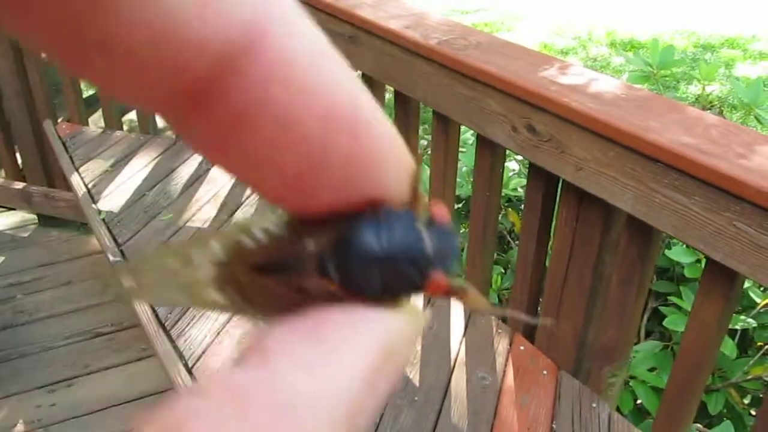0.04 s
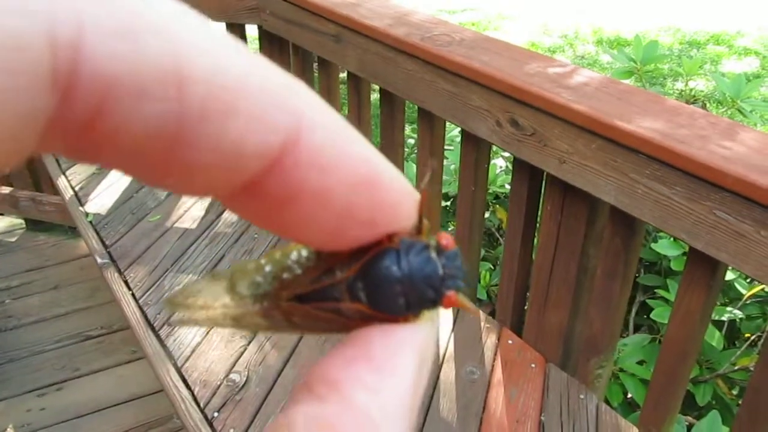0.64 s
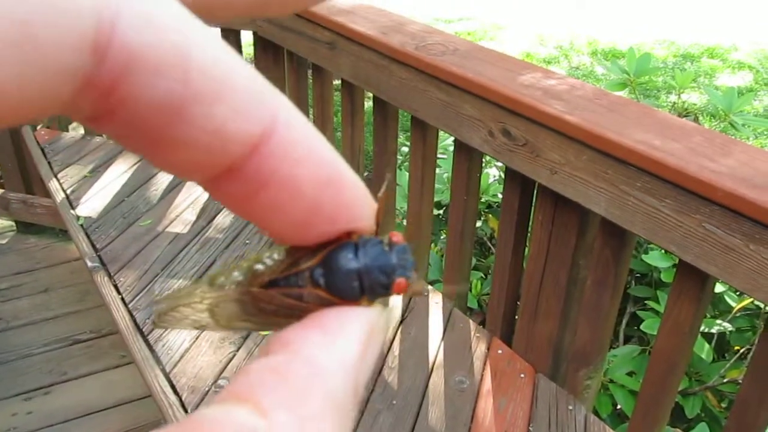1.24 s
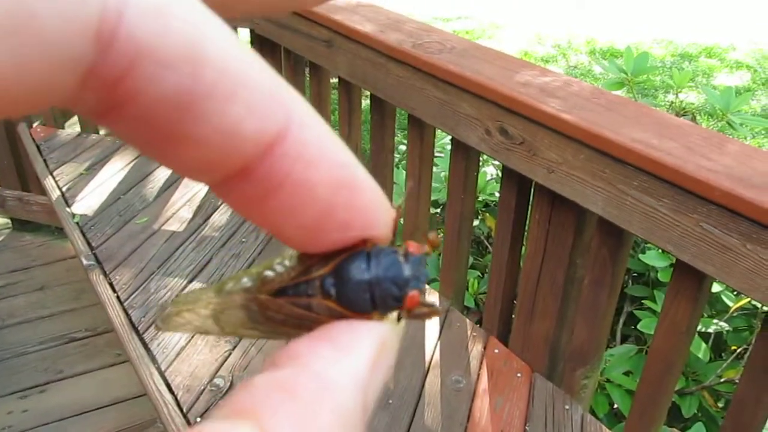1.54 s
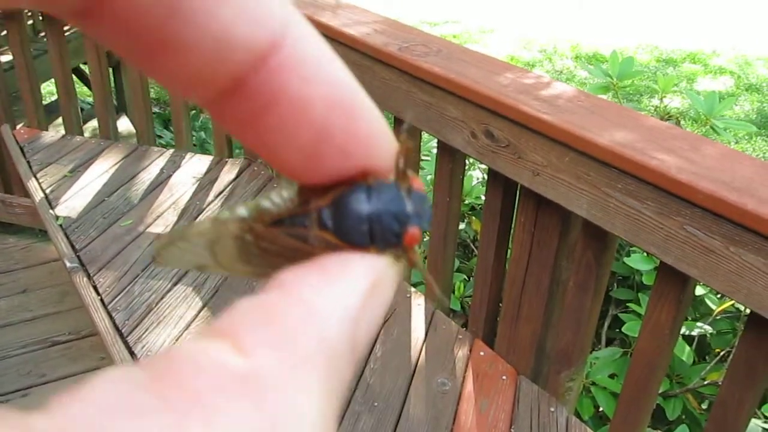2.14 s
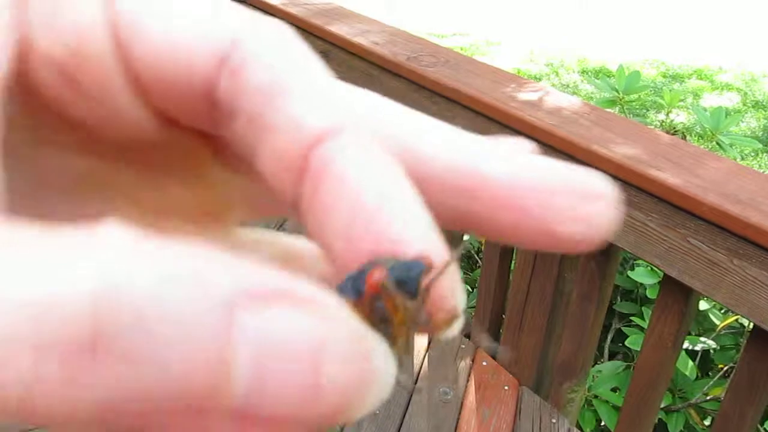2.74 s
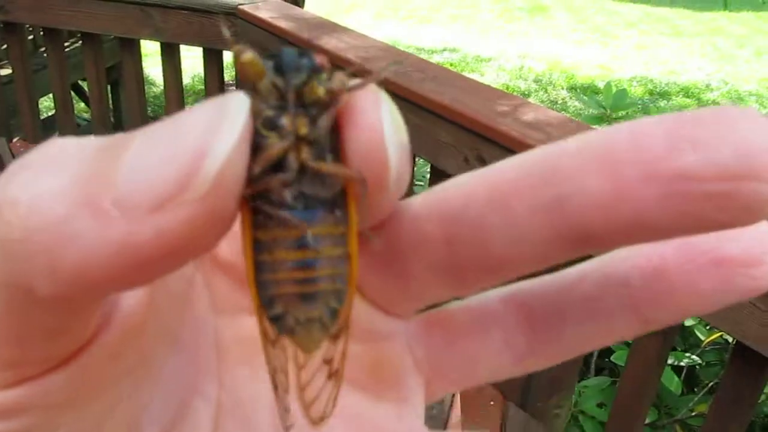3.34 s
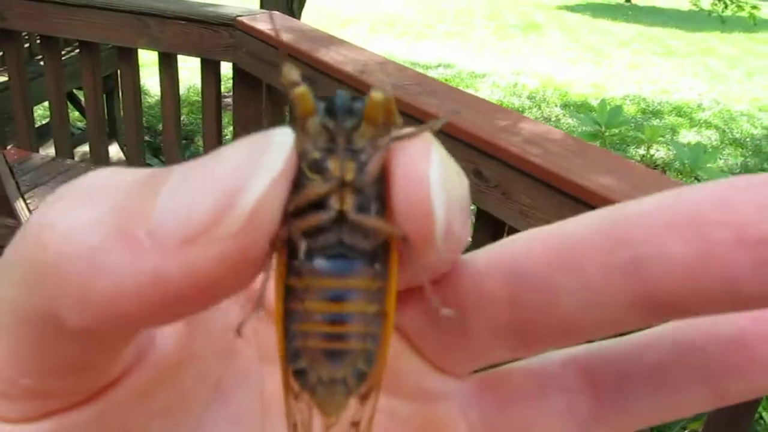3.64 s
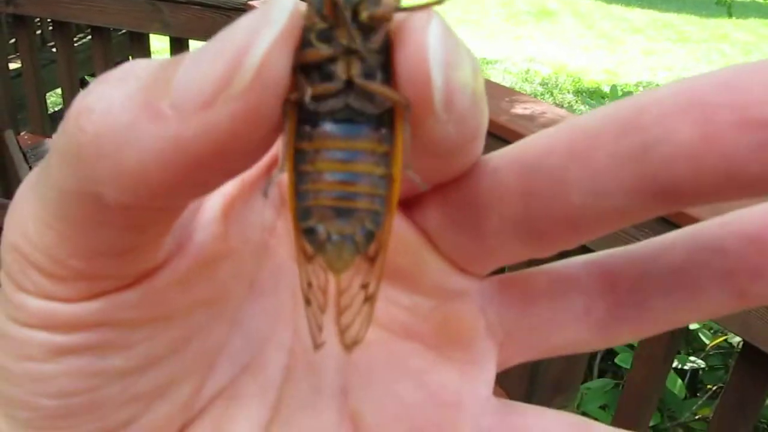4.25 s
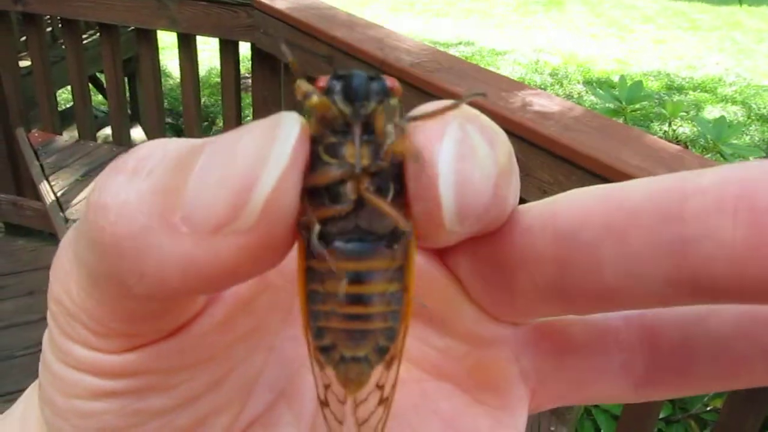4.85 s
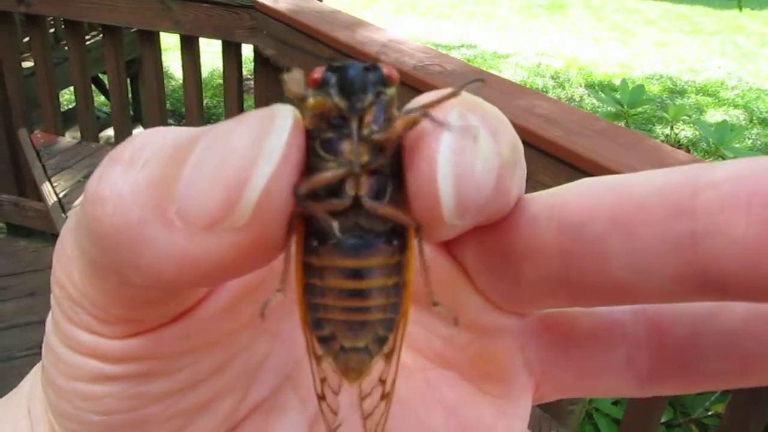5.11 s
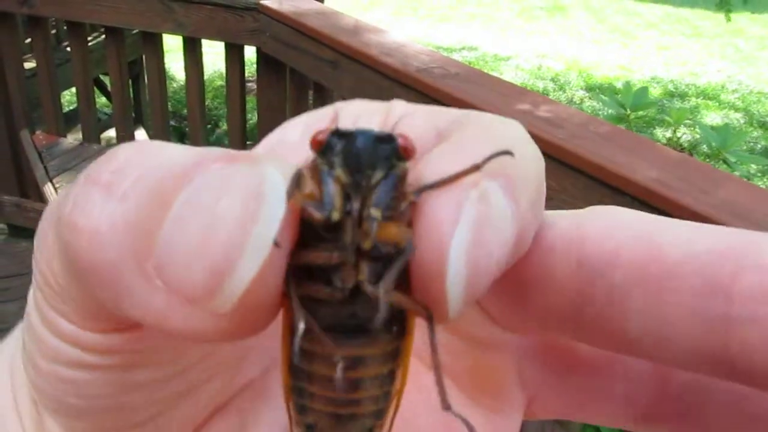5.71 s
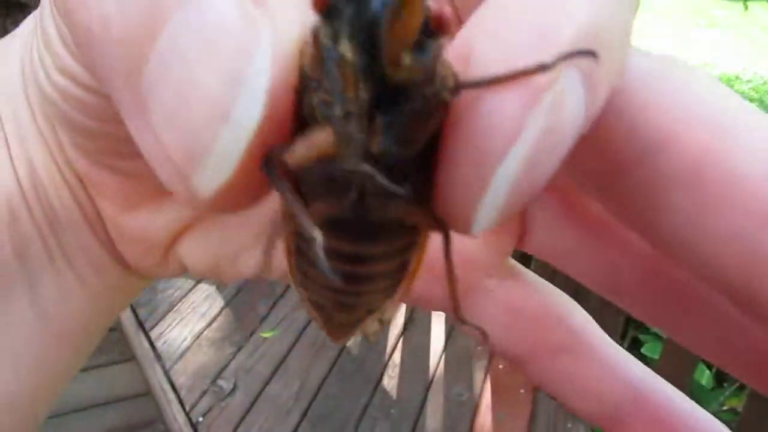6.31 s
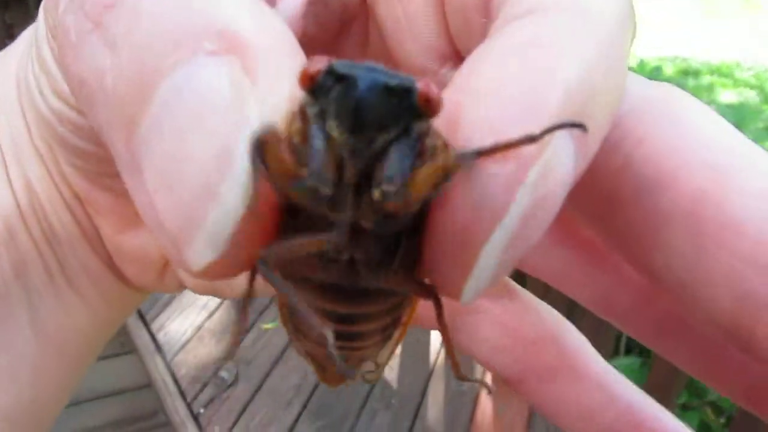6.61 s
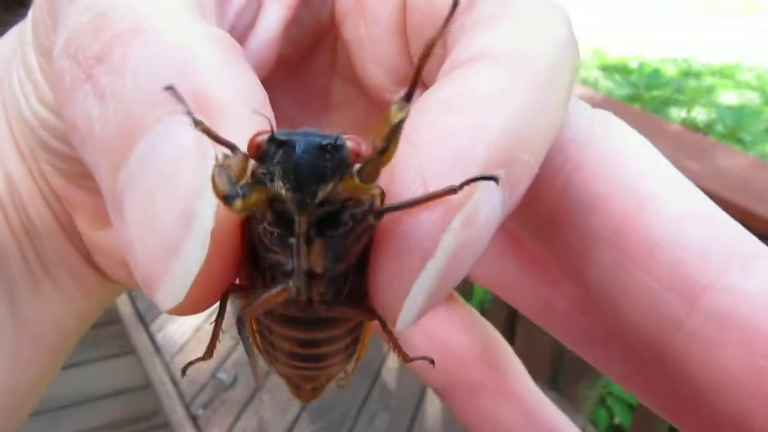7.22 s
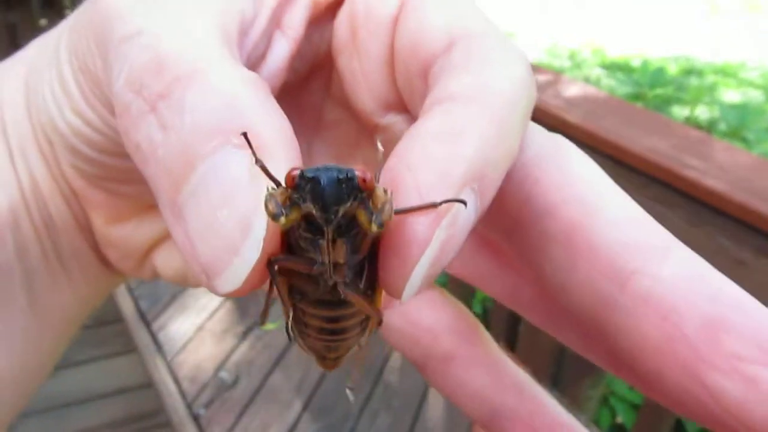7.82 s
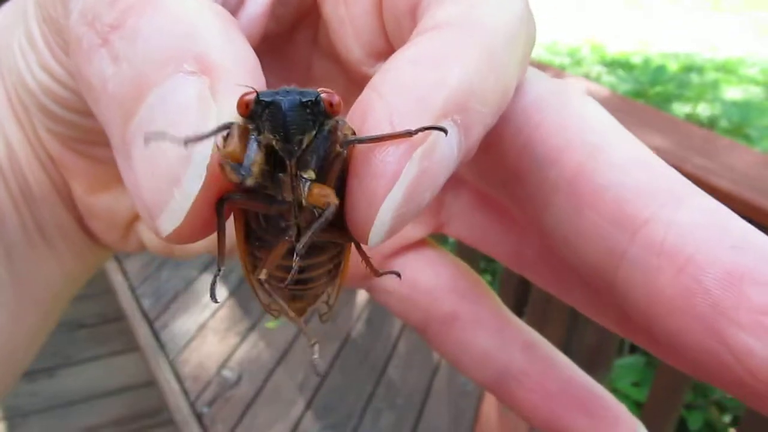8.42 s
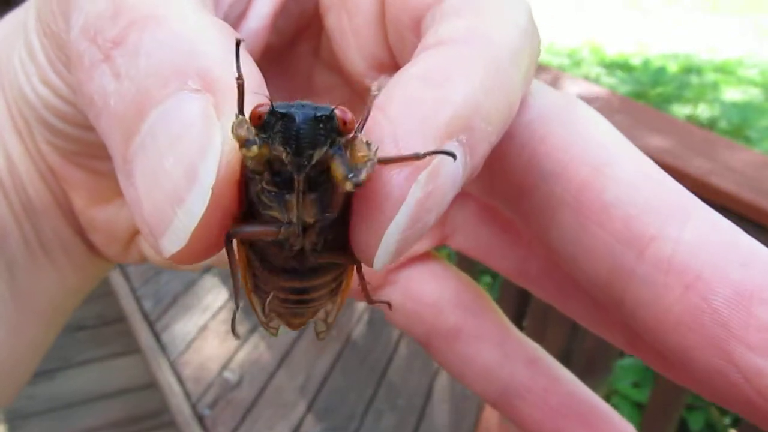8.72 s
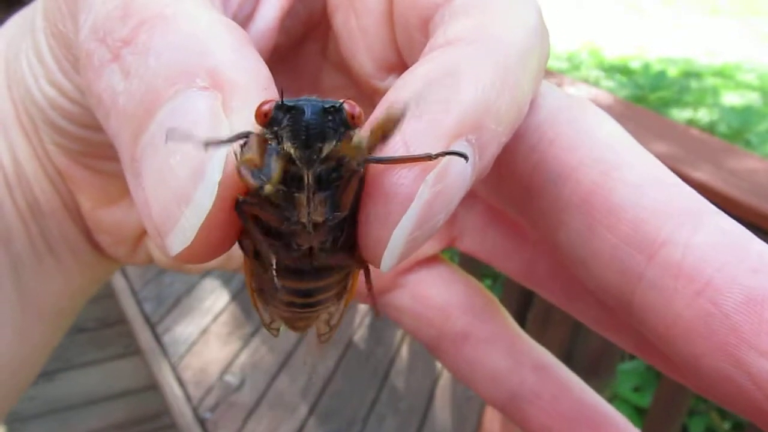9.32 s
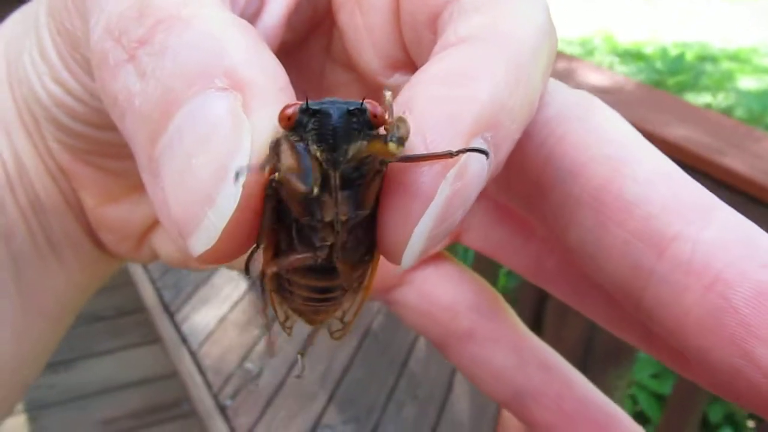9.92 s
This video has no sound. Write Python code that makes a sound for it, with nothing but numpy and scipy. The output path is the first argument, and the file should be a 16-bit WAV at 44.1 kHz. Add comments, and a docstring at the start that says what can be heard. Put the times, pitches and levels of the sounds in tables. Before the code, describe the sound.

A cicada held right at the microphone squawks for the whole ten seconds in very short, rasping, pulsed buzzes, roughly ten a second, uneven in spacing and loudness. They thin out a little around 4 seconds and between 6 and 7, then crowd together from about 8, with one longer buzz just after 9. Behind it, a distant chorus of cicadas in the trees holds a steady high hiss over a hollow, wavering drone. A far bird gives a faint rising whistle at 0.5 seconds, then a rising, a held and another rising whistle from 4.4 to 5.6. A small insect adds one faint, very high sizzle around 1 second. Wind gusts rumble on the microphone, mostly on the right, with low thumps near 1.3, 2.5, 4.3 and 5.2 seconds and the strongest buffeting between 7.7 and 8.8.

```python
"""Short rasping squawks, right at the microphone: a periodical cicada held between finger and thumb.
Each buzz is a run of tymbal pulses: the ribs buckle one after another, click, and pump the hollow abdomen.
Farther off, its brood hisses and drones in the trees around the deck, a distant bird whistles and a small
insect sizzles once on the lawn. Gusts buffet the microphone, mostly at its right port."""
import sys
import numpy as np
from scipy import signal
from scipy.fft import rfft, irfft
from scipy.io import wavfile

SR = 44100
rng = np.random.default_rng(int(sys.argv[2]) if len(sys.argv) > 2 else 0)


def int16_out(signal):
    """Quantize to a 16-bit WAV file."""
    q = np.round(np.clip(np.atleast_2d(signal).T, -1, 1) * 32767)
    wavfile.write(sys.argv[1], SR, q.astype(np.int16))


N = 439236
TIME = np.arange(N) / SR

# Squawks of the held cicada. Each row: start in seconds, length in seconds.
BUZZES = [(0.0, 0.013), (0.038, 0.048), (0.1, 0.036), (0.164, 0.034), (0.245, 0.039), (0.327, 0.035),
          (0.4, 0.033), (0.48, 0.036), (0.569, 0.029), (0.641, 0.036), (0.74, 0.032), (0.872, 0.0085),
          (0.897, 0.048), (0.968, 0.063), (1.141, 0.032), (1.226, 0.039), (1.325, 0.033), (1.431, 0.039),
          (1.515, 0.028), (1.576, 0.057), (1.647, 0.046), (1.73, 0.009), (1.764, 0.035), (1.855, 0.018),
          (2.04, 0.045), (2.124, 0.03), (2.198, 0.036), (2.286, 0.02), (2.352, 0.043), (2.447, 0.085),
          (2.559, 0.027), (2.604, 0.033), (2.709, 0.015), (2.763, 0.026), (2.815, 0.032), (2.872, 0.048),
          (2.998, 0.026), (3.085, 0.028), (3.145, 0.032), (3.296, 0.038), (3.357, 0.043), (3.432, 0.044),
          (3.521, 0.026), (3.585, 0.045), (3.684, 0.02), (3.748, 0.022), (3.947, 0.016), (4.034, 0.017),
          (4.089, 0.036), (4.206, 0.0063), (4.345, 0.025), (4.396, 0.007), (4.456, 0.031), (4.548, 0.03),
          (4.612, 0.036), (4.691, 0.028), (4.754, 0.049), (4.816, 0.044), (4.879, 0.052), (4.956, 0.048),
          (5.022, 0.11), (5.156, 0.04), (5.242, 0.042), (5.403, 0.03), (5.593, 0.078), (5.736, 0.025),
          (5.795, 0.038), (5.847, 0.043), (5.906, 0.053), (5.988, 0.025), (6.075, 0.042), (6.189, 0.017),
          (6.26, 0.032), (6.363, 0.025), (6.533, 0.025), (6.657, 0.02), (6.812, 0.032), (7.013, 0.04),
          (7.184, 0.026), (7.262, 0.027), (7.344, 0.032), (7.443, 0.022), (7.539, 0.042), (7.662, 0.029),
          (7.748, 0.027), (7.809, 0.033), (7.902, 0.032), (7.962, 0.048), (8.034, 0.035), (8.088, 0.058),
          (8.166, 0.068), (8.258, 0.045), (8.323, 0.054), (8.433, 0.034), (8.483, 0.043), (8.542, 0.056),
          (8.616, 0.038), (8.69, 0.045), (8.775, 0.048), (8.854, 0.057), (8.941, 0.046), (9.006, 0.043),
          (9.057, 0.33), (9.41, 0.045), (9.471, 0.047), (9.532, 0.056), (9.616, 0.045), (9.685, 0.057),
          (9.751, 0.048), (9.808, 0.052), (9.887, 0.058)]
# Loudness of the squawks as heard, rising and falling, and ducking under the strongest gust.
# Each row: time in seconds, relative level in dB.
SQUAWK_LEVEL = [(0.0, -19.5), (0.88, -22.0), (1.0, -31), (1.34, -27), (1.6, -19.5), (1.86, -25.0),
                (2.62, -16.5), (3.1, -20.5), (3.31, -18.0), (4.36, -21), (5.04, -16), (5.26, -21),
                (5.81, -17.0), (7.2, -17.5), (8.21, -23.0), (8.45, -29.5), (8.63, -16.5), (8.8, -24.5),
                (9.2, -16.5), (9.43, -18.0), (9.56, -26.5), (9.96, -21.0)]
# How it sits in the grip. Each row: time in seconds, rib rate in Hz at usual loudness, sizzle gain in dB.
POSTURE = [(0, 1124, -2.5), (2.3, 1112, 2), (2.7, 1186, -3), (3.05, 1102, 2), (5.751, 1096, -0.5),
           (5.95, 1149, -2), (6.299, 1094, 2.5), (7.4, 1097, -1.5), (8.3, 1141, 1.5), (9.25, 1150, 0),
           (9.7, 1103, 4.5)]
# The colour its shell gives the clicks. Each row: frequency in Hz, gain in dB.
SHELL = [(1200, -12), (1550, 10), (1850, 3), (2200, 3.5), (2750, -7.5), (3150, 1.5), (4300, 0), (5800, -10),
         (7600, -13), (8900, -9.5), (10000, -13), (12000, -16.5), (13200, -16), (15500, -27.5)]
# Level of the distant hiss as heard; it ducks briefly under the strongest gust.
# Each row: time in seconds, relative level in dB.
HISS_LEVEL = [(0.0, -29.5), (1.27, -28), (1.5, -30.5), (4.02, -26.5), (5.27, -29.5), (8.63, -29.5),
              (8.76, -31.5), (9.96, -27.5)]
# Spectra of the hissing and the droning species. Each row: frequency in Hz, relative density in dB.
HISS = [(1800, -32), (2700, -20), (3200, -15.5), (3900, -7), (4500, -6), (5300, 1), (5800, 2), (6500, -5.5),
        (7200, -15.5), (8700, -21.5), (9800, -32.5), (11800, -33), (15000, -61)]
DRONE = [(200, -17.5), (750, -26), (1100, -11.5), (1270, -1), (1400, 4), (1550, -17), (1750, -18),
         (2600, -38.5)]
# Breeze on the microphone, at first in the open, then in the lee.
# Each row: time in seconds, left and right relative levels in dB.
BREEZE = [(3.5, -42, -39.5), (3.8, -49.5, -44.5)]
# Gusts. Each row: crest in seconds, rise (and fall) time in seconds, left and right relative levels in dB.
GUSTS = [(.17, 0.17, -36, -48), (0.862, 0.71, -50, -38), (1.29, 0.31, -37, -28), (2.52, 0.31, -52, -29.5),
         (3.097, 0.37, -46, -30), (4.293, 0.17, -60, -26.5), (4.698, 0.24, -60, -36),
         (5.237, 0.39, -60, -27.5), (5.861, .25, -36, -29), (6.25, 0.61, -60, -33.5),
         (6.862, 0.23, -60, -30), (7.378, 0.51, -60, -25.5), (7.92, 0.58, -42, -23), (8.52, .2, -27.5, -19),
         (8.769, 0.31, -32, -14.5), (9.302, 0.51, -60, -29), (9.68, 0.11, -39, -28)]
# Sudden shoves of air on the right port. Each row: time in seconds, relative peak in dB.
BUFFETS = [(1.229, -18.5), (1.312, -17.5), (2.528, -17.5), (4.272, -16.5), (5.202, -15), (6.869, -25),
           (7.745, -7.5), (8.011, -11.5), (8.463, -11), (8.684, -12.5), (8.779, -10)]
# The distant bird. Each row: start and length in seconds, first and last pitch in Hz, level in dB.
WHISTLES = [(0.497, 0.17, 2310, 2870, -42), (4.36, 0.18, 2272, 3013, -45), (4.546, 0.82, 2280, 2250, -43),
            (5.431, 0.17, 2325, 2944, -40)]


def held_cicada(pulse_s=.0086, snap_back_s=.008, membrane_ring_s=.0016, glide=.18, sizzle_hz=6500,
                tone_db=5.0, rib_db=-10.0, snap_db=.3, crackle_db=-15.0, click_follow=.4):
    """Ribs buckle ever more slowly in a pulse, one click per abdomen cycle; then the tymbal snaps back."""
    abdomen, clicks = np.zeros(N), np.zeros(N)
    along = np.linspace(0, 1, int(pulse_s * SR))
    envelope = np.abs(np.sin(np.pi * along ** .94)) ** .91
    for s, db, rib_hz, phase in tymbal_pulses(pulse_s):
        cycles = phase % 1 + np.cumsum(rib_hz * (1 + glide * (.5 - along))) / SR
        add(abdomen, s, from_db(db + tone_db) * envelope * np.sin(2 * np.pi * cycles))
        ribs_s = np.searchsorted(cycles, np.arange(7)) / SR
        clicks_s = np.append(ribs_s, snap_back_s * (1 + rng.normal() / 20))
        # the clicks come straight off the shell and vary less in level than the abdomen's note
        clicks_db = np.append(np.full(len(ribs_s), rib_db), snap_db) + click_follow * db
        clicks_db += .5 * rng.standard_normal(len(clicks_s))
        samples = np.clip(((s + clicks_s) * SR).astype(int), 0, N - 1)
        np.add.at(clicks, samples, from_db(clicks_db))
    # the stiff membrane rings on in many close, quickly fading modes, joining the clicks into a rasp
    ring = signal.lfilter([1], [1, -np.exp(-1 / (membrane_ring_s * SR))], clicks + 1e-18)
    crackle = from_db(crackle_db) * ring * rng.standard_normal(N)
    rasp = colour(butter(clicks + crackle, 800, "high"), SHELL)
    # the treble is beamed, so it depends on how the fingers cover the tymbals
    _, sizzle_db = in_time(POSTURE)
    sizzle = butter(rasp, sizzle_hz, "high", order=1)
    return pan(abdomen, right_db=3.0) + pan(rasp - sizzle, right_db=7.0) + sizzle * from_db(sizzle_db)


def tymbal_pulses(pulse_s, gap_s=.0076, jitter_s=.00035, level_spread_db=.92, pitch_spread=.022,
                  sag=.035, hz_per_db=7.0, usual_db=-19.0, slip_cycles=.15, stumble_chance=.06):
    """The two tymbals pull in turn; the ribs buckle faster in louder squawks, and each buzz slackens."""
    squawk_db, = in_time(SQUAWK_LEVEL)
    rib_hz = in_time(POSTURE)[0] + hz_per_db * (squawk_db - usual_db)
    for start, length in BUZZES:
        span = max(length - pulse_s, 0)
        count = 1 + int(round(span / gap_s))
        stumbles = rng.random() < stumble_chance and 2 < count < 10
        phase, previous_s = 0, start
        for k, (late, loud, sharp, stray) in enumerate(rng.standard_normal((count, 4))):
            if stumbles and k == 1:   # the second tymbal misses its first turn
                continue
            along = k / (count - 1) if count > 1 else .5
            s = start + along * span + (0 < k < count - 1) * jitter_s * late
            now = int(np.clip(s * SR, 0, N - 1))
            hz = rib_hz[now] * (1 + pitch_spread * sharp + sag * (.5 - along))
            # the abdomen is still ringing, so each pulse falls roughly in step with the last
            phase += hz * (s - previous_s) + slip_cycles * stray
            previous_s = s
            yield s, squawk_db[now] + level_spread_db * loud, hz, phase


def chorus(hiss_gain_db=.36, drone_db=-37.5, flutter_db=.3, waver_db=2.5):
    """Thousands of callers far off in the trees melt into a high hiss over a hollow, wavering drone."""
    hiss_db, = in_time(HISS_LEVEL)
    hiss = rms_one(colour(stereo_noise(likeness=-.067), HISS))
    hiss *= np.sqrt(2) * from_db(hiss_db + hiss_gain_db + flutter_db * drift(24))
    drone = rms_one(colour(stereo_noise(likeness=.35), DRONE))
    drone *= from_db(drone_db + waver_db * drift(7.7))
    return pan(hiss, right_db=2.5) + pan(drone, right_db=1.0)


def wind(left_trim_db=-4.0):
    """Gusts swell and die over a light breeze; the microphone's right port faces them."""
    power = from_db(in_time(BREEZE)) ** 2
    for crest, rise_s, *ports_db in GUSTS:
        swell = np.cos(np.pi / 2 * np.clip((TIME - crest) / rise_s, -1, 1)) ** 4
        power += np.outer(from_db(ports_db), swell) ** 2
    left_db, right_db = 10 * np.log10(power)
    return np.array([port_wind(left_db + left_trim_db), port_wind(right_db) + buffets()])


def port_wind(gust_db, lump_db=6.0, stall_db=-11.5, floor_hz=52, body_hz=140, edge_hz=340):
    """Lumpy turbulence at one port; the strongest eddies stop growing and reach higher in pitch."""
    level_db = gust_db + lump_db * np.clip(drift(22.3), -2, 2)
    strength = from_db(level_db) / np.hypot(1, from_db(level_db - stall_db))
    body = noise_band(floor_hz, body_hz, top_order=3)
    edge = noise_band(body_hz, edge_hz, top_order=4)
    edge_share = from_db(level_db + 3.5)
    return strength * (body + edge_share * edge) / np.hypot(1, edge_share)


def buffets(gain_db=6.0, full_scale_width_s=.00076, quicken=.45):
    """Each shove of air on the port is one swing of pressure; harder ones are briefer."""
    shoves = np.zeros(N)
    for s, peak_db in BUFFETS:
        db = peak_db + gain_db
        width_s = full_scale_width_s * from_db(-quicken * db)
        widths = np.linspace(-4, 4, int(8 * width_s * SR))
        swing = widths * np.exp((1 - widths ** 2) / 2)
        add(shoves, s - len(swing) / SR / 2, from_db(db) * swing)
    return shoves


def bird(blur_hz=90):
    """Far whistles rise and level off, or hold; the trees scatter them differently to left and right."""
    pitch, loudness = np.zeros(N), np.zeros(N)
    for s, length, start_hz, end_hz, db in WHISTLES:
        along = np.linspace(0, 1, int(length * SR))
        add(pitch, s, start_hz + (end_hz - start_hz) * np.sin(np.pi / 2 * along))
        add(loudness, s, from_db(db) * np.sqrt(np.abs(np.sin(np.pi * along))))
    scatter = rms_one(butter(rng.standard_normal((2, N)), blur_hz, "low"))
    return loudness * scatter * np.sqrt(2) * np.sin(2 * np.pi * np.cumsum(pitch) / SR)


def grass_insect(start_s=.73, length_s=.77, pitch_hz=11800, q=12, level_db=-47.0):
    """Out on the lawn, a smaller insect gives one thin, very high sizzle."""
    resonance = signal.iirpeak(pitch_hz, q, fs=SR)
    sizzle = rms_one(signal.lfilter(*resonance, rng.standard_normal((2, N))))
    swell = np.sin(np.pi * np.clip((TIME - start_s) / length_s, 0, 1))
    return from_db(level_db) * sizzle * swell


def from_db(db):
    """Decibels to gain."""
    return 10 ** (np.asarray(db) / 20)


def rms_one(x):
    """Scale to unit rms."""
    return x / np.sqrt(np.mean(x ** 2) + 1e-20)


def in_time(rows):
    """Each column after the time, interpolated at every sample."""
    s, *columns = np.transpose(rows)
    return [np.interp(TIME, s, column) for column in columns]


def add(track, s, sound):
    """Mix a sound into a track at s seconds."""
    i = int(np.clip(s * SR, 0, N))
    track[i:i + len(sound)] += sound[:N - i]


def butter(x, hz, kind, order=2):
    """Low- or high-pass."""
    return signal.sosfilt(signal.butter(order, hz, kind, fs=SR, output="sos"), x)


def noise_band(low_hz, high_hz, top_order):
    """A band of noise at unit rms."""
    rumble = butter(rng.standard_normal(N), high_hz, "low", top_order)
    return rms_one(butter(rumble, low_hz, "high"))


def drift(hz, hop=40, settle=4000):
    """A slow random wander of unit rms, mostly below hz."""
    pole = np.exp(-2 * np.pi * hz * hop / SR)
    noise = rng.standard_normal(N // hop + settle + 2)
    slow = signal.lfilter([1], [1, -2 * pole, pole ** 2], noise)[settle:]
    return np.interp(np.arange(N) / hop, np.arange(len(slow)), rms_one(slow))


def colour(x, spectrum, size=2048):
    """Causal (minimum-phase) filter that follows a spectrum."""
    hz, db = np.transpose(spectrum)
    grid = np.linspace(1, SR / 2, size // 2 + 1)
    gain = from_db(np.interp(np.log(grid), np.log(hz), db))
    cepstrum = irfft(np.log(gain))
    cepstrum[1:size // 2] *= 2
    cepstrum[size // 2 + 1:] = 0
    response = irfft(np.exp(rfft(cepstrum)))
    return signal.fftconvolve(x, np.array(response, ndmin=x.ndim), axes=-1)[..., :N]


def stereo_noise(likeness):
    """White noise in two channels whose correlation is likeness."""
    mid, side = rng.standard_normal((2, N))
    return np.sqrt(1 + likeness) * mid + np.sqrt(1 - likeness) * np.array([side, -side])


def pan(x, right_db):
    """Lean a sound to the right."""
    return x * from_db([[-right_db / 2], [right_db / 2]])


def scene():
    """From the deck: the cicada close up, brood, bird and insect far off, wind on the microphone."""
    return held_cicada() + chorus() + bird() + grass_insect() + wind()


def record(dry, notch_hz=7860, notch_q=22, stopband_hz=16200):
    """The camera's microphone has a narrow treble notch, overloads at full scale and cuts the top."""
    notched = signal.lfilter(*signal.iirnotch(notch_hz, notch_q, fs=SR), dry)
    top_cut = signal.cheby2(16, 70, stopband_hz, fs=SR, output="sos")
    return signal.sosfilt(top_cut, np.clip(notched, -1, 1))


dry = scene()
out = record(dry)
int16_out(out)
```